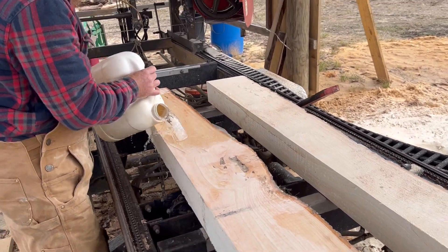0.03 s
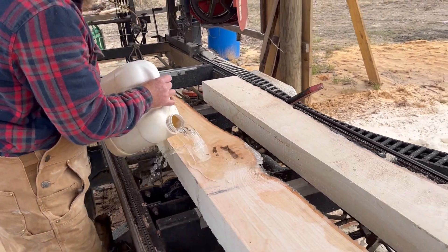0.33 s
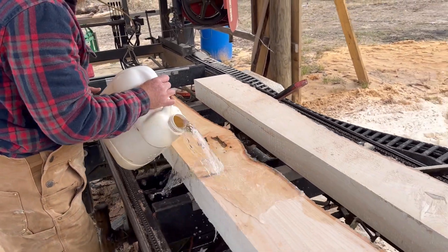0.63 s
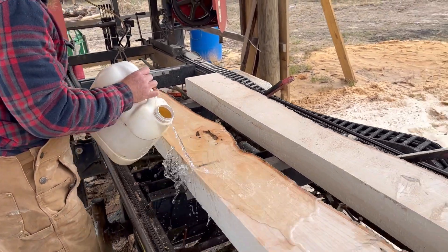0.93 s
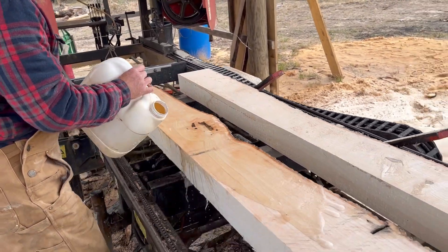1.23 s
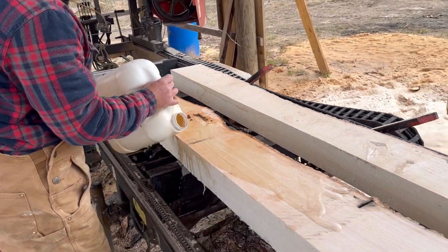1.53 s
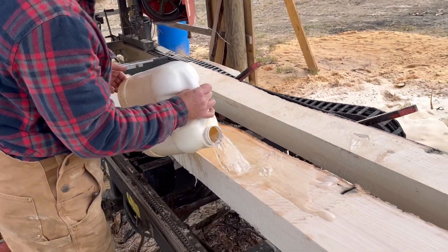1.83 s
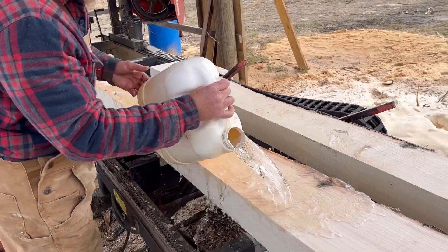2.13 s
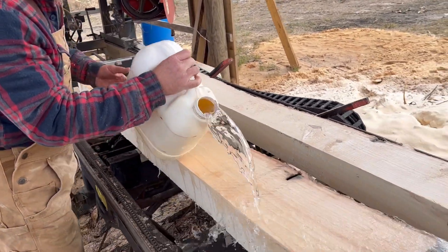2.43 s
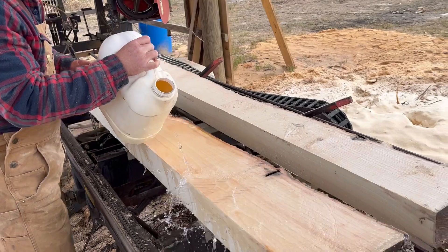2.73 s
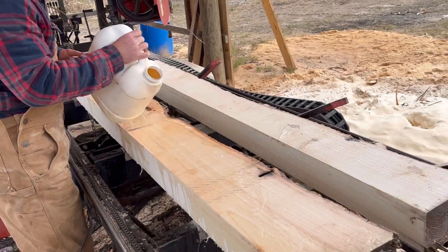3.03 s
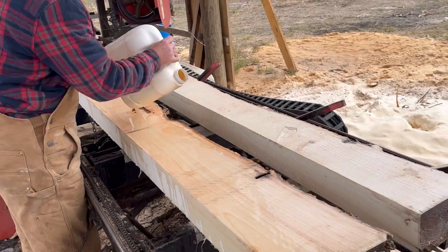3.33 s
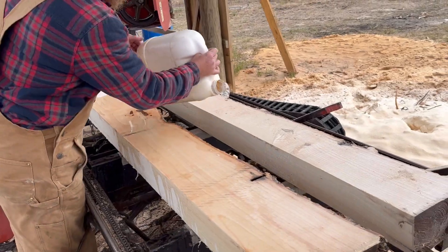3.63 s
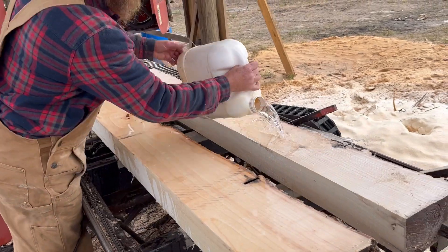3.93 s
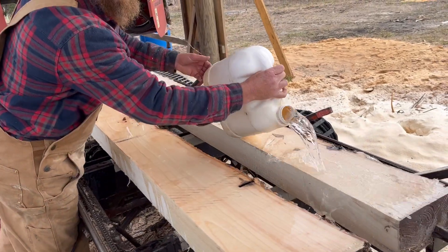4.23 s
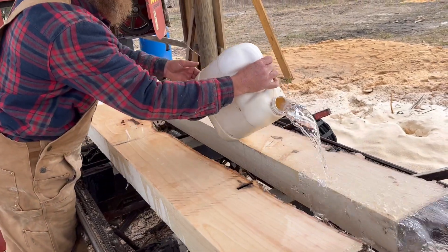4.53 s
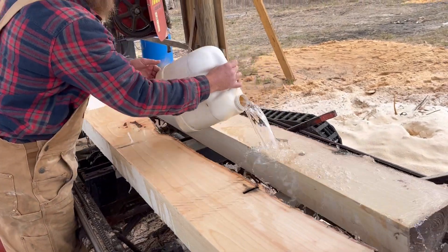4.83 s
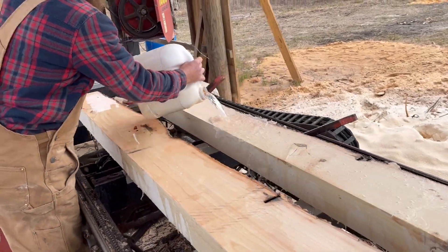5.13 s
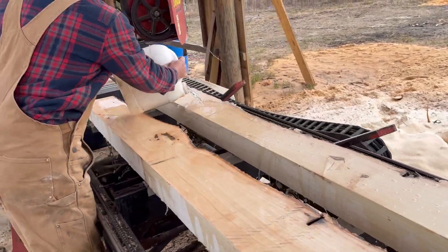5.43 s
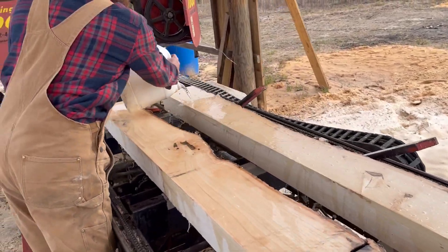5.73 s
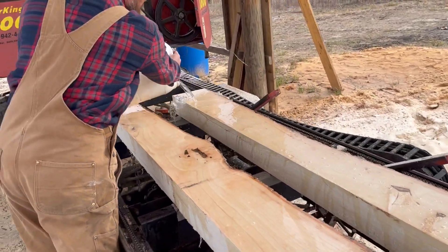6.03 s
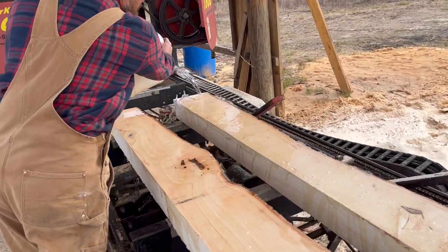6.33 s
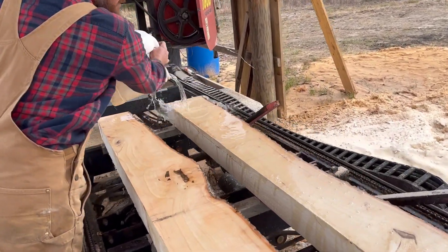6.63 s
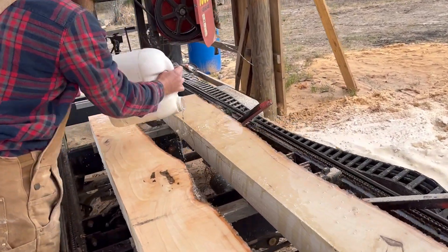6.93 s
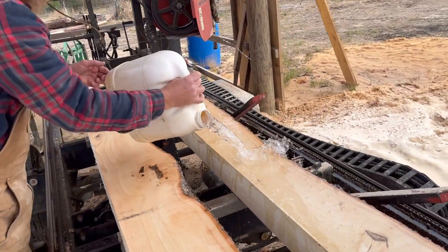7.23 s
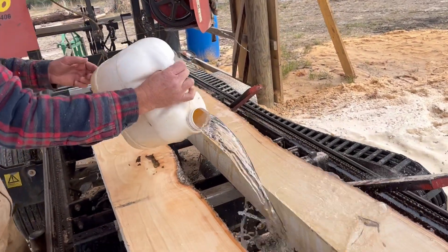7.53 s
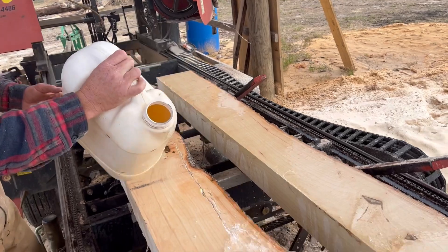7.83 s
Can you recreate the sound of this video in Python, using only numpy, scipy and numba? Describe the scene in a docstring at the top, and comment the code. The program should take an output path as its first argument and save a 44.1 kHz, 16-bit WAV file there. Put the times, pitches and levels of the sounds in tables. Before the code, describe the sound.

Close by in an open yard, water sloshes out of a plastic jug and splashes across timber in a string of irregular bursts. Bubbles chirp, droplets tick sharply and a few hollow gulps sound among the splashes. Between the bigger pours, water trickles and patters softly onto sawdust. The thin jug knocks around the middle and again at the end. A low rumble with soft bumps and a faint airy wash continue underneath.

```python
"""Water is sloshed in gushes from a plastic jug over sawn boards at an open-air sawmill.
The stream slaps the wood and traps short-lived bubbles and air pockets that ring and rise in pitch.
Spray fizzes and ticks all around, cavities gulp, the board drums and the jug's thin wall knocks.
The run-off patters dully on the sawdust below, and the timber scatters a short tail.
A low rumble with a few soft bumps and a faint wash of outdoor air lie behind it."""
import sys
import numpy as np
from scipy import signal
from scipy.fft import rfft, irfft, next_fast_len
from scipy.io import wavfile
from scipy.ndimage import uniform_filter1d
from numba import njit

SR = 44100
rng = np.random.default_rng(int(sys.argv[2]) if len(sys.argv) > 2 else 0)


def generate_wav(signal):
    """Clip the signal to [-1, 1] and save it as 16-bit WAV at the path in sys.argv[1]."""
    frames = np.transpose(np.atleast_2d(signal))
    scaled = np.clip(frames, -1, 1) * 32767
    pcm = np.round(scaled).astype(np.int16)
    wavfile.write(sys.argv[1], SR, pcm)


N = 355931
TIME = np.arange(N) / SR
TOP_CUT_HZ = 15650
STREAM_RELEASE_DB_PER_S, SPRAY_RELEASE_DB_PER_S = 176, 127

# Gushes from the jug: (time [s], length [s], stream level [dB], spray level [dB], bubble pitch [Hz])
GUSHES = [(0.038, 0.019, -68.5, -54.5, 2500), (0.259, 0.07, -58, -59.5, 1790),
          (0.414, 0.06, -51, -53, 2500), (0.617, 0.18, -51.5, -55.5, 2250), (0.898, 0.22, -58.5, -55, 2130),
          (1.234, 0.017, -53, -55.5, 1900), (1.336, 0.2, -69, -71, 1900), (1.75, 0.097, -64, -63.5, 2504),
          (1.832, 0.14, -47, -59, 1520), (1.965, 0.08, -51.5, -61.5, 1560), (2.191, 0.14, -46, -51, 2770),
          (2.403, 0.043, -52.5, -51, 2460), (2.546, 0.11, -46, -48, 3000),
          (3.009, 0.19, -58.5, -53.5, 2850), (3.798, 0.16, -55, -57.5, 2020), (3.915, 0.16, -59, -64, 2620),
          (4.099, 0.045, -45.5, -56, 1880), (4.23, 0.079, -61.5, -57.5, 2300),
          (4.367, 0.13, -45, -54, 2000), (4.65, 0.095, -40.5, -44.5, 2400), (4.788, 0.12, -47, -50.5, 2140),
          (4.915, 0.1, -46, -51, 1650), (5.072, 0.071, -56.5, -54, 1587), (5.226, 0.27, -55.5, -51.5, 2150),
          (5.576, 0.3, -62.5, -66.5, 2200), (5.783, 0.089, -67, -59.5, 2150), (5.87, 0.072, -63, -56, 2350),
          (5.992, 0.019, -62, -56, 2330), (6.117, 0.14, -59.5, -58.5, 1780), (6.276, 0.59, -72, -58, 1900),
          (6.53, 0.1, -50.5, -49.5, 2270), (6.734, 0.14, -61, -54.5, 2940), (6.953, 0.15, -71, -59, 2370),
          (7.131, 0.06, -51.5, -53, 3930), (7.221, 0.13, -47, -51, 2240), (7.358, 0.11, -46.5, -53, 2920),
          (7.536, 0.13, -71, -55.5, 2570), (7.691, 0.065, -49, -44.5, 2840),
          (7.758, 0.081, -46.5, -41, 2360), (7.94, 0.2, -55, -51, 2540)]


def pouring(runoff_db, trickle_db=-70, spatter_db=-62.5, rise_octaves=0.24):
    """Gushes ride on the run-off's trickle: curves of stream level, bubble pitch and spray level."""
    swing_db = 1.05 * (runoff_db - runoff_db.mean())
    stream_power = from_db(trickle_db + swing_db) ** 2
    spray_power = from_db(spatter_db + swing_db) ** 2
    weighted_hz = stream_power * np.mean([hz for *_, hz in GUSHES])
    for s, length_s, stream_db, spray_db, hz in GUSHES:
        power = from_db(stream_db + surge_db(s, length_s, STREAM_RELEASE_DB_PER_S)) ** 2
        progress = np.clip((TIME - s) / length_s, 0, 1)
        octaves = rise_octaves * (progress - .5)  # bubbles get smaller as the water spreads
        stream_power += power
        weighted_hz += power * hz * 2 ** octaves  # the strongest gush leads the pitch
        spray_power += from_db(spray_db + surge_db(s, length_s, SPRAY_RELEASE_DB_PER_S)) ** 2
    return 10 * np.log10(stream_power), weighted_hz / stream_power, 10 * np.log10(spray_power)


# Mid-forward EQ of water on wood: (frequency [Hz], level [dB])
STREAM_EQ = [(450, -23), (800, 3.5), (1300, 5), (2200, 2), (3200, 1), (4500, -2.5), (7000, -8.5),
             (12000, -47)]


def stream(level_db, pitch_hz, spread_octaves=0.91, wash_db=-10):
    """The jet folds air into the film on the board: more flow, more bubbles, loudest near one pitch."""
    def near_pitch(hz, at):
        return 1 / (1 + (np.log2(hz / pitch_hz[at]) / spread_octaves) ** 2)

    per_s = 1700 * from_db(.4 * (level_db + 50))
    bubbles = grains(per_s, 650, 5800, cycles=36, size_db=4, pan_db=5, rise=.12, weight=near_pitch)
    wash = from_db(wash_db) * stereo_noise(side_db=1)
    return from_db(level_db - 1.5) * levelled(coloured(bubbles + wash, STREAM_EQ), window_s=0.064)


# The largest air pockets, ringing as the water closes on them:
# (time [s], level [dB], pitch [Hz], pan to the left [dB], decay [cycles], pitch rise [fraction])
BIG_PLOPS = [(0.324, -40, 1470, -3, 27, .05), (0.743, -46, 2120, -3, 23, .05),
             (0.8237, -37, 1370, -2, 3.9, 0), (0.863, -48, 1400, -4, 60, 1),
             (1.8672, -23.5, 1990, 0, 56, 0.093), (1.867, -36, 1310, -5, 33, 0.21),
             (1.906, -40, 1430, -8, 50, .08), (1.927, -40, 1260, -5, 36, 0),
             (1.9735, -32.5, 1400, -4, 17, 0.1), (2.021, -45, 1850, 0, 44, 0),
             (2.211, -38, 2110, -3, 22, 0.29), (2.221, -35, 1700, 0, 19, .05),
             (2.256, -28, 3055, -1, 24, 0), (2.281, -33, 2437, -4, 28, .05),
             (2.284, -39, 1550, -2, 63, 0.11), (2.296, -36, 3050, 7, 43, .05),
             (2.418, -37.5, 2120, -5, 40, 0.31), (2.626, -29, 3605, 3, 18, 0.14),
             (2.692, -24, 3130, 1, 10, 0), (3.827, -44, 1950, -2, 63, 0.18),
             (3.84, -41.5, 984, -4, 25, 0.17), (3.906, -37.5, 2590, -3, 71, 0.2),
             (4.091, -36.5, 750, -4, 28, 0.071), (4.0915, -38, 2100, -4, 28, 0.23),
             (4.136, -42, 1070, -5, 29, 0), (4.187, -45, 1507, -2, 32, .05), (4.252, -39, 2550, 0, 29, 0),
             (4.272, -30.5, 2634, 0, 13, 0), (4.3065, -25.5, 1374, -4, 49, 0.2),
             (4.532, -39, 3020, -2, 26, .05), (4.561, -30.5, 4020, 5, 23, .05),
             (4.658, -21, 2350, 0, 19, 0.3), (4.674, -30, 2500, 0, 20, .05),
             (4.75, -29.5, 1970, -2, 26, 0.43), (5.219, -27.5, 2740, 2, 3, .05),
             (5.491, -34.5, 2030, 0, 10, .05), (6.159, -40.5, 2166, -2, 49, .05),
             (6.456, -41, 1900, -1, 47, 0.15), (6.473, -42, 3150, 4, 19, .05),
             (6.867, -39, 2650, -1, 36, .1), (6.992, -46, 2580, 0, 41, 0.12),
             (7.256, -39, 2297, -2, 41, 0.36), (7.311, -36, 2135, -3, 37, .1),
             (7.486, -43, 2680, -1, 42, .05), (7.7, -36, 3970, 5, 42, .05),
             (7.7425, -32.5, 2434, 1, 28, .05), (7.787, -33.5, 1410, 0, 35, 0.11),
             (7.895, -37, 3240, -3, 24, 0.17), (7.925, -33, 2740, 1, 52, 0), (8.002, -42, 2500, 12, 45, 0)]


def plops(strays, upper_ratio=1.7, upper_db=-17, splat_db=-19, splat_t60=0.11):
    """Each air pocket rings briefly, with a weaker upper mode, inside the splat that traps it."""
    out, t = np.zeros((2, N)), TIME[:4096]
    for s, db, hz, pan_db, cycles, rise in BIG_PLOPS + strays:
        t60 = max(cycles, 3) / hz
        rising_hz = hz * (1 + rise * np.minimum(t / t60, 1))
        phase = 2 * np.pi * np.cumsum(rising_hz) / SR
        tone = (np.sin(phase) + from_db(upper_db) * np.sin(upper_ratio * phase)) * dying(t, 1 / hz, t60)
        splat = bandpass(rng.standard_normal((2, len(t))), 0.39 * hz, min(1.6 * hz + 800, .45 * SR))
        splat = from_db(splat_db) * splat / np.std(splat) * dying(t, 0.001, splat_t60)
        add(out, s, from_db(db) * panned(pan_db) * (tone + splat))
    return out


def stray_plops(stream_db, pitch_hz, per_s=16, over_db=4, spread_db=2.5, spread_octaves=0.382):
    """Air pockets close at random, following the stream's level and pitch: rows like BIG_PLOPS."""
    at = np.flatnonzero(rng.random(N) < per_s / SR)
    size, pitch, place = np.clip(rng.standard_normal((len(at), 3)), -2, 2).T
    db = stream_db[at] + over_db + spread_db * size
    hz = pitch_hz[at] * 2 ** (spread_octaves * pitch)
    pan_db, cycles, rise = -7 * place, np.full(len(at), 33), 0.25 * rng.random(len(at))
    return list(zip(at / SR, db, hz, pan_db, cycles, rise))


# Wide, bright EQ of the spray: (frequency [Hz], level [dB])
SPRAY_EQ = [(600, 6), (1500, 1.5), (2800, 0.5), (4200, 4.5), (6000, 2.7), (8000, 1), (11000, 3.5),
            (15500, -5)]


def spray(level_db, clumped_share=.28):
    """Droplets land in soft spatters: tiny bubbles fizz, larger ones chirp, bare hits tick over mist."""
    per_s = 4500 * from_db(.35 * (level_db + 52))
    surge = np.sqrt(1 - clumped_share + clumped_share * spatters(per_s=35, t60=.09))
    ticks = impacts(per_s * .6, size_db=3, pan_db=4)
    fizz = grains(per_s * 1.3, 2200, 15500, cycles=26, size_db=4, pan_db=6, rise=.1)
    chirps = grains(per_s * .07, 2000, 7000, cycles=28, size_db=4, pan_db=7, rise=.2)
    mist = from_db(-5) * stereo_noise(side_db=-4)
    drizzle = surge * (from_db(-6) * ticks / np.std(ticks) + mist + fizz) + from_db(-4.5) * chirps
    return from_db(level_db + 2) * levelled(coloured(drizzle, SPRAY_EQ), window_s=.06)


def spatters(per_s, t60):
    """Droplets arrive in clumps: brief surges of power at random moments; mean 1."""
    surges = (rng.random(N) < per_s / SR) * rng.uniform(.2, 1, N)
    feedback = from_db(-120 / (t60 * SR))
    power = signal.lfilter([1], [1, -feedback], surges + 1e-18)
    return power / power.mean()


# Accent drops smacking on wood and steel: (time [s], level [dB], resonance [Hz], break-up time [s])
ACCENT_DROPS = [(0.077, -41, 9200, .02), (0.177, -42.5, 4870, 0.019), (0.5033, -43, 6500, .02),
                (0.703, -41, 10500, .02), (0.722, -42, 4400, 0.016), (0.942, -41, 10030, 0.016),
                (0.8955, -40, 12900, .018), (0.9885, -37, 12500, .005), (0.998, -39, 4500, .035),
                (1.028, -35, 12000, .009), (1.0753, -37.5, 10100, 0.032), (1.153, -38.5, 4860, 0.016),
                (1.2432, -40.5, 2030, 0.038), (1.355, -47, 4800, 0.019), (1.513, -55, 7150, 0.024),
                (1.538, -49, 10500, 0.026), (1.6075, -45, 12570, 0.0087), (1.704, -53, 10100, 0.012),
                (1.742, -46.5, 2397, 0.015), (2.446, -25.5, 3830, 0.009), (2.5053, -35.5, 5004, 0.012),
                (2.541, -38.5, 3460, 0.023), (2.547, -31, 2930, 0.016), (2.7132, -30.5, 5970, 0.02),
                (2.746, -29, 6550, 0.014), (2.7803, -42, 5370, 0.0095), (2.789, -33.5, 10260, .015),
                (2.8135, -33, 9500, 0.01), (2.839, -31.5, 5040, 0.036), (2.8525, -42, 5000, 0.0074),
                (2.8745, -36, 10900, 0.011), (2.8945, -38, 5200, 0.012), (2.913, -34, 4630, 0.0076),
                (3.021, -39, 4150, .018), (3.0472, -34, 4700, 0.02), (3.0962, -33, 4770, 0.0091),
                (3.1225, -39, 3800, 0.01), (3.135, -33.5, 4800, 0.014), (3.153, -42, 10500, .01),
                (3.2463, -41, 5200, 0.025), (3.29, -45, 4810, .01), (3.307, -48, 10020, 0.019),
                (3.381, -42, 5350, 0.02), (3.385, -44, 12000, 0.012), (3.443, -49, 10700, 0.014),
                (3.5195, -43, 8900, 0.014), (3.555, -47, 6500, 0.011), (3.6325, -37, 13100, 0.0065),
                (3.6462, -40, 5580, 0.013), (3.688, -52, 11000, 0.0089), (3.8246, -37.5, 7516, 0.011),
                (3.945, -36.5, 6460, 0.019), (4.0638, -45, 6860, 0.035), (4.298, -34, 5900, 0.02),
                (4.3605, -40, 6950, .016), (4.6792, -22, 3600, 0.014), (4.7237, -30.5, 6700, 0.019),
                (4.7365, -31, 4000, 0.015), (4.9671, -34.5, 5000, 0.015), (4.987, -35, 3000, 0.015),
                (5.0938, -40.5, 4470, 0.02), (5.258, -41, 3850, 0.014), (5.299, -44, 11120, .01),
                (5.364, -37, 9900, 0.011), (5.4912, -36.5, 6500, 0.03), (5.6345, -36.5, 5100, 0.012),
                (6.1145, -46, 2905, 0.021), (6.1554, -41.5, 6810, 0.014), (6.3585, -46, 9700, 0.017),
                (6.4342, -46, 10600, .008), (6.474, -40.5, 10010, 0.022), (6.97, -45, 9900, .02),
                (7.029, -49, 12000, .008), (7.129, -40.5, 8750, 0.024), (7.26, -33, 7700, 0.01),
                (7.563, -34.5, 2640, 0.0066), (7.61, -38.5, 6240, 0.02), (7.6995, -40, 9000, .012),
                (7.9228, -27, 11300, 0.0066)]


def drops(strays, tick_db=4, tick_t60=0.00022, body_db=11):
    """A drop cracks on a hard face, with one broad resonance, then breaks up into droplets."""
    out, t = np.zeros((2, N)), TIME[:2048]
    for s, db, hz, breakup_s in ACCENT_DROPS + strays:
        breakup = dying(t, .0001, breakup_s)
        tick = from_db(tick_db) * dying(t, .0001, tick_t60)
        crack = rng.standard_normal(len(t)) * (breakup + tick)
        body = from_db(body_db) * signal.lfilter(*signal.iirpeak(min(hz, .4 * SR), 3.2, SR), crack)
        # big drops lack the top, small ones the bottom
        smack = bandpass(crack + body, min(0.23 * hz, TOP_CUT_HZ / 2), min(3.3 * hz, TOP_CUT_HZ))
        add(out, s, from_db(db) * smack * np.linalg.norm(breakup) / np.linalg.norm(smack))
    return out


def stray_drops(spray_db, per_s=13, over_db=2.5, spread_db=13.5, centre_hz=5400, spread_octaves=0.57):
    """Drops are flung out at random, their level following the spray: rows like ACCENT_DROPS."""
    at = np.flatnonzero(rng.random(N) < per_s / SR)
    size, pitch = np.clip(rng.standard_normal((len(at), 2)), -2, 2).T
    db = spray_db[at] + over_db + spread_db * size
    hz = centre_hz * 2 ** (spread_octaves * pitch)
    breakup_s = np.full(len(at), 0.0085)
    return list(zip(at / SR, db, hz, breakup_s))


# Heavy gulps and gobs of water:
# (time [s], level [dB], start pitch [Hz], end pitch [Hz], attack [s], decay [cycles])
GULPS = [(0.8232, -26.5, 926, 120, 0.0032, 9), (0.846, -37.5, 260, 140, 0.0045, 13),
         (1.244, -39.5, 420, 173, 0.0032, 24), (2.055, -39.5, 170, 173.4, 0.052, 17.5),
         (2.107, -45, 484, 374, 0.004, 44), (2.544, -45.5, 340, 306, 0.01, 34),
         (2.746, -32, 340, 204, 0.0026, 5.4), (2.837, -35, 422.4, 243, 0.0013, 29),
         (2.857, -38, 202, 108, 0.0013, 4.6), (3.2, -37.5, 162.4, 140, 0.0067, 14),
         (4.305, -41, 407, 201, 0.0044, 10.5), (6.2, -40.5, 327.6, 243, 0.0072, 24),
         (6.355, -46.5, 505, 256, 0.0014, 12.6), (8.045, -42, 810, 458, 0.0012, 16.3)]


def gulps(glide_s=0.0035, churn_db=-14, churn_attack_s=0.016):
    """A cavity forms in the water: it slides quickly into a hollow note, and water churns after it."""
    out, t = np.zeros((2, N)), TIME[:16384]
    for s, db, start_hz, end_hz, attack_s, cycles in GULPS:
        t60 = max(cycles, 3) / end_hz
        hz = end_hz + (start_hz - end_hz) * np.exp(-t / glide_s)
        note = np.sin(2 * np.pi * np.cumsum(hz) / SR) * dying(t, attack_s, t60)
        churn = bandpass(rng.standard_normal(len(t)), 0.26 * end_hz, 2 * end_hz)
        churn = from_db(churn_db) * churn / np.std(churn) * dying(t, churn_attack_s, 2 * t60)
        add(out, s, from_db(db) * (note + churn))
    return out


# Heavy hits of water on the board: (time [s], length [s], level [dB])
BOARD_HITS = [(0.313, 0.018, -55.5), (0.725, 0.021, -50.5), (3.83, 0.032, -62.5), (4.115, 0.027, -71),
              (4.652, 0.092, -49.5), (4.78, 0.17, -50.5), (5.105, 0.033, -61), (6.156, 0.096, -54.5)]
# Hollow, woody EQ of the board: (frequency [Hz], level [dB])
BOARD_EQ = [(150, -11), (280, 8), (500, -4.5), (750, -3), (1100, -3.5), (1600, -6), (3000, -26)]


def board():
    """Where the full weight of a gush lands, the thick board drums with short, hollow pats."""
    pats = grains(700, 210, 1420, cycles=20, size_db=3.5, pan_db=7.5)
    hits_db = [db + surge_db(s, length_s, STREAM_RELEASE_DB_PER_S) for s, length_s, db in BOARD_HITS]
    return from_db(summed_db(*hits_db)) * levelled(coloured(pats, BOARD_EQ), window_s=0.053)


# Knocks as the jug gulps air or is swung: (time [s], level [dB], pitch [ratio], pan to the left [dB])
JUG_KNOCKS = [(1.867, -50, .98, -5), (4.306, -40.5, 0.95, 1), (8.041, -34, 0.93, 6)]
# Resonances of the plastic wall: (frequency [Hz], level [dB], 60 dB decay [s])
JUG_MODES = [(437, -19.5, 0.064), (826, -4.5, 0.037), (1030, -13, 0.22), (1220, -1, 0.029),
             (1438, -5, 0.12), (1880, -5, .025), (2060, -14, 0.12), (2170, 0, 0.064), (2570, -7, 0.032),
             (3110, -5, 0.034)]


def jug(attack_s=0.0004):
    """The thin plastic wall knocks and rings hollow; the water inside shifts each knock's pitch."""
    out, t = np.zeros((2, N)), TIME[:8192]
    for s, db, pitch, pan_db in JUG_KNOCKS:
        ring = np.zeros(len(t))
        for k, (hz, mode_db, t60) in enumerate(JUG_MODES):
            mode = np.sin(2 * np.pi * pitch * hz * t) * dying(t, attack_s, t60)
            ring += (-1) ** k * from_db(mode_db) * mode
        add(out, s, from_db(db) * panned(pan_db) * ring)
    return out


# Fader curve of the water falling off the boards: (time [s], level [dB])
RUNOFF_FADER = [(0.0, -57), (0.6, -60), (0.9, -53.5), (1.26, -57), (1.42, -64.5), (1.72, -64),
                (2.45, -55.5), (2.66, -54.5), (2.74, -47), (2.88, -47), (3.0, -53.5), (3.34, -61.5),
                (3.76, -66), (4.4, -58), (4.75, -50.5), (5.15, -57.5), (5.48, -53), (5.75, -60.5),
                (6.22, -58), (6.5, -62), (7.4, -62.5), (8.07, -56.5)]


def runoff_level():
    """The flow off the boards swells and ebbs: its level in dB at every sample."""
    return np.interp(TIME, *np.transpose(RUNOFF_FADER))


# Dull, bass-heavy EQ of drops on sawdust: (frequency [Hz], level [dB])
RUNOFF_EQ = [(70, 6.5), (130, 7.5), (260, -0.5), (400, -6.5), (650, -23), (1200, -16.5), (2500, -28),
             (6000, -55)]


def runoff(runoff_db, stream_db, drumming_db=-19.5):
    """Fat drops thud into soft sawdust; the stream drumming on the board adds to the same patter."""
    level_db = summed_db(runoff_db, stream_db + drumming_db)
    thuds = grains(260, 122.2, 1170, cycles=8.7, size_db=4, pan_db=4)
    return from_db(level_db + 2.5) * levelled(coloured(thuds, RUNOFF_EQ), window_s=0.012)


def yard(sound, t60=0.035, wet_db=-9):
    """Timber and the mill frame scatter a short, dull tail, different on each side."""
    t = TIME[:12000]
    tail = rng.standard_normal((2, len(t))) * dying(t, 0.0054, t60)
    tail /= np.linalg.norm(tail, axis=1, keepdims=True)
    tail = bandpass(tail, 350, 4500, order=1)
    return sound + from_db(wet_db) * signal.fftconvolve(sound, tail, axes=1)[:, :N]


# Soft, deep bumps in the rumble: (time [s], length [s], level [dB])
RUMBLE_BUMPS = [(0.82, 0.053, -47), (2.12, 0.1, -51), (2.834, 0.042, -41), (3.865, 0.065, -42),
                (4.103, 0.045, -42), (4.653, 0.48, -43), (7.085, 0.053, -41.5), (7.554, 0.39, -45.5)]
# Low-end EQ of the rumble: (frequency [Hz], level [dB])
RUMBLE_EQ = [(15, -41), (30, -19), (40, -12.5), (60, -1.5), (80, -5), (100, -8), (140, -17.5), (250, -30.5),
             (600, -39.5), (3000, -53)]


def rumble(runoff_db, steady_db=-49, over_runoff_db=3):
    """A bed of low noise swells under heavy run-off and bumps now and then."""
    bumps_db = [db + surge_db(s, length_s, release_db_per_s=252) for s, length_s, db in RUMBLE_BUMPS]
    level_db = summed_db(steady_db, runoff_db + over_runoff_db, *bumps_db)
    bed = coloured(stereo_noise(side_db=-18), RUMBLE_EQ)
    return from_db(level_db) * levelled(bed, window_s=0.59)


# EQ of the outdoor ambience, soft mids and a thin hiss: (frequency [Hz], level [dB])
AIR_EQ = [(100, 12), (400, 20), (750, 20.5), (1200, 13.5), (2000, 6.5), (4000, -11.5), (15500, 4)]


def air(level_db=-64):
    """A faint, wide, steady wash of outdoor noise."""
    return from_db(level_db) * coloured(stereo_noise(side_db=-1.5), AIR_EQ)


def from_db(db):
    """Decibels to gain."""
    return 10 ** (np.asarray(db) / 20)


def summed_db(*levels_db):
    """The level of several unrelated sounds together."""
    return 10 * np.log10(sum(from_db(db) ** 2 for db in levels_db))


def surge_db(s, length_s, release_db_per_s, attack_s=0.016, sag_db_per_s=10.5):
    """The envelope of one surge: a quick swell, a slow sag, then the release."""
    t = TIME - s
    swell = 20 * np.log10(np.clip(t / attack_s, 1e-4, 1))
    fall = sag_db_per_s * np.maximum(t, 0) + release_db_per_s * np.maximum(t - length_s, 0)
    return swell - np.minimum(fall, 100)


def dying(t, attack_s, t60):
    """A quick attack and an exponential decay; peak 1."""
    shape = (1 - np.exp(-(t / attack_s) ** 2)) * np.exp(-np.log(1000) * t / t60)
    return shape / shape.max()


def at_hz(points, hz):
    """Read a table on a log-frequency axis."""
    known_hz, values = np.transpose(points)
    return np.interp(np.log(np.maximum(hz, 1)), np.log(known_hz), values)


def bandpass(x, low_hz, high_hz, order=2):
    """Roll off the lows and the highs."""
    return signal.sosfilt(signal.butter(order, [low_hz, high_hz], "band", fs=SR, output="sos"), x)


def filtered(x, response):
    """Apply a smooth frequency response, given as a function of Hz."""
    size = next_fast_len(N + 4096)
    hz = np.arange(size // 2 + 1) * SR / size
    return irfft(rfft(x, size) * response(hz), size)[..., :N]


def coloured(x, eq):
    """Shape a sound with an EQ curve; rms 1."""
    y = filtered(x, lambda hz: from_db(at_hz(eq, hz)))
    return y / np.std(y)


def levelled(x, window_s):
    """Keep the fine grain of a texture but hold its slow level at 1."""
    size = int(window_s * SR)
    power = np.mean(x ** 2, axis=0)
    return x / np.sqrt(uniform_filter1d(uniform_filter1d(power, size), size) + 1e-6)


def panned(pan_db):
    """Left and right gains; positive leans left."""
    return from_db(np.array([[.5], [-.5]]) * pan_db)


def stereo_noise(side_db):
    """Mid-side white noise; side_db sets the width."""
    mid, side = rng.standard_normal((2, N))
    return mid + from_db(side_db) * side * np.array([[1], [-1]])


def add(out, s, sound):
    """Mix a short sound in at time s."""
    start = max(round(s * SR), 0)
    part = out[:, start:start + sound.shape[-1]]
    part += sound[..., :part.shape[-1]]


def impacts(per_s, size_db, pan_db):
    """Random stereo clicks of uneven size and place; their mean power is the same at any rate."""
    hits = rng.random(N) < per_s / SR
    sizes = from_db(size_db * np.minimum(rng.exponential(1, N), 3.5)) * rng.choice([-1, 1], N)
    return hits * sizes / np.sqrt(per_s) * panned(pan_db * rng.standard_normal(N))


def grains(per_s, low_hz, high_hz, cycles, size_db, pan_db, rise=0, weight=lambda hz, at: 1):
    """Random impacts, each ringing briefly at its own pitch; cycles and rise are means; rms 1."""
    clicks = impacts(per_s, size_db, pan_db)
    at = np.flatnonzero(clicks[0])
    pitch, length, glide = rng.random((N, 3))[at].T
    hz = low_hz * (high_hz / low_hz) ** pitch
    gains = clicks[:, at] * hz * weight(hz, at)
    out = ringing(at, hz, gains, cycles * (.5 + length), 2 * rise * glide)
    return out / np.std(out)


@njit
def ringing(starts, hz, gains, cycles, rise):
    """Sum of stereo tones, each fading by 60 dB and gliding up by the fraction 'rise' over its life."""
    out = np.zeros((2, N))
    for k in range(len(starts)):
        life = cycles[k] * SR / hz[k]
        step, decay, height = 2 * np.pi * hz[k] / SR, np.exp(-np.log(1000) / life), 1.0
        for i in range(min(int(life), N - starts[k])):
            value = height * np.cos(step * (i + .5) * (1 + .5 * rise[k] * i / life))
            out[0, starts[k] + i] += gains[0, k] * value
            out[1, starts[k] + i] += gains[1, k] * value
            height *= decay
    return out


# Stereo placement of the splash: (frequency [Hz], pan to the left [dB])
SPLASH_PAN = [(200, -1), (700, -0.7), (1400, -4), (2100, 0.5), (3500, 4.5), (5500, 1.5), (8000, 0)]


def scene():
    """The mix: water and jug go through the yard's tail, over dry rumble and air."""
    runoff_db = runoff_level()
    stream_db, pitch_hz, spray_db = pouring(runoff_db)
    landing = stream(stream_db, pitch_hz) + spray(spray_db) + drops(stray_drops(spray_db))
    splash = landing + runoff(runoff_db, stream_db) + board() + gulps()
    splash = filtered(splash, lambda hz: panned(at_hz(SPLASH_PAN, hz)))
    background = rumble(runoff_db) + air()
    return yard(splash + jug() + plops(stray_plops(stream_db, pitch_hz))) + background


# Phase between the two microphone ports: (frequency [Hz], left lead [rad])
PORT_PHASE = [(20, 0), (2000, .05), (3000, .5), (4900, .55), (5600, -.8), (6500, -1.1), (8300, -3.14),
              (10000, -4.6), (11400, -6.2), (12600, -6.35), (15000, -9.3), (16000, -9.42)]


def record(dry):
    """Two spaced microphone ports fall out of phase in the treble; a steep top cut follows."""
    ports = filtered(dry, lambda hz: np.exp(1j * np.array([[.5], [-.5]]) * at_hz(PORT_PHASE, hz)))
    return signal.sosfilt(signal.ellip(10, .2, 80, TOP_CUT_HZ, fs=SR, output="sos"), ports)


dry = scene()
out = record(dry)
generate_wav(out)
```